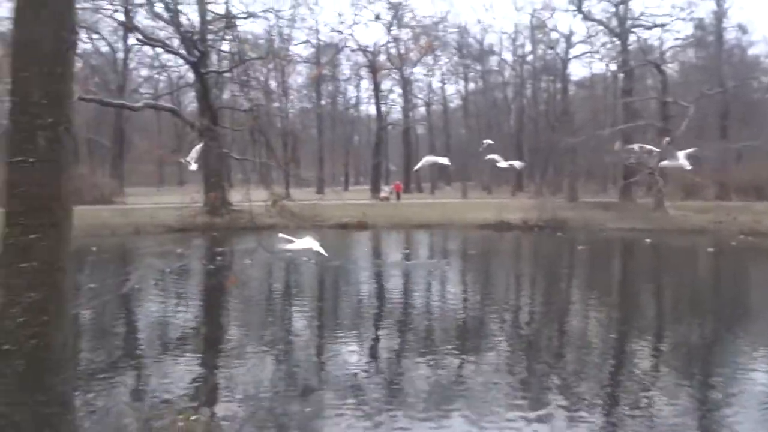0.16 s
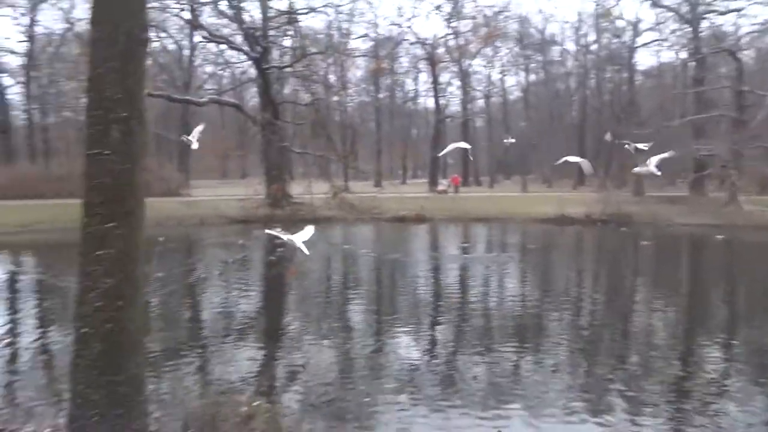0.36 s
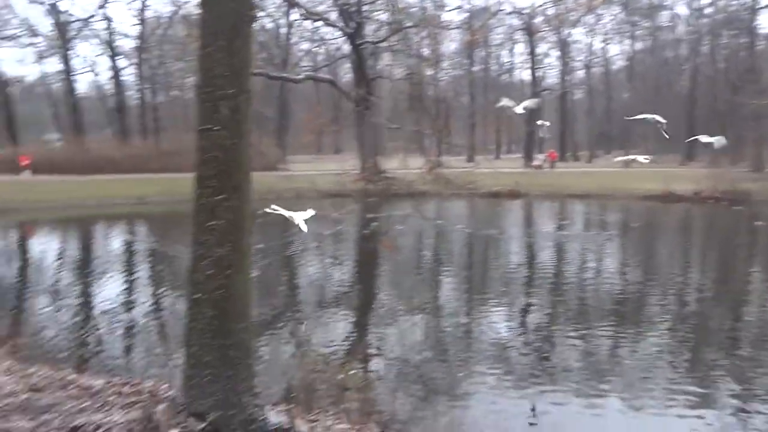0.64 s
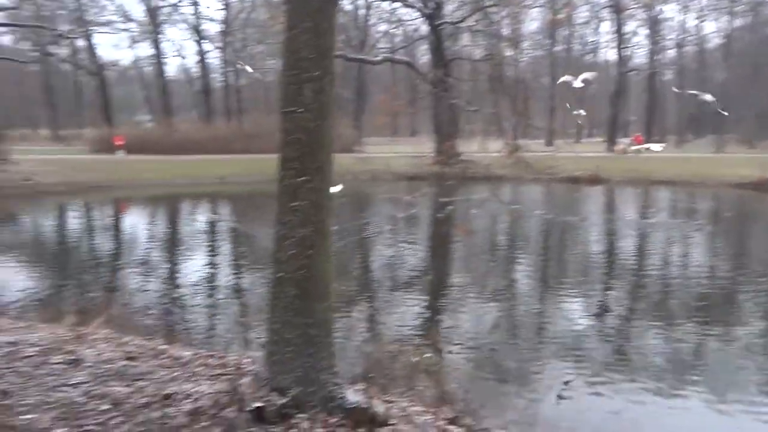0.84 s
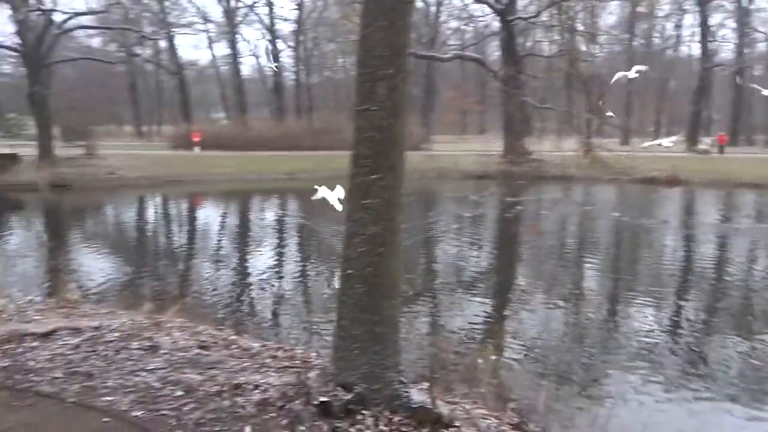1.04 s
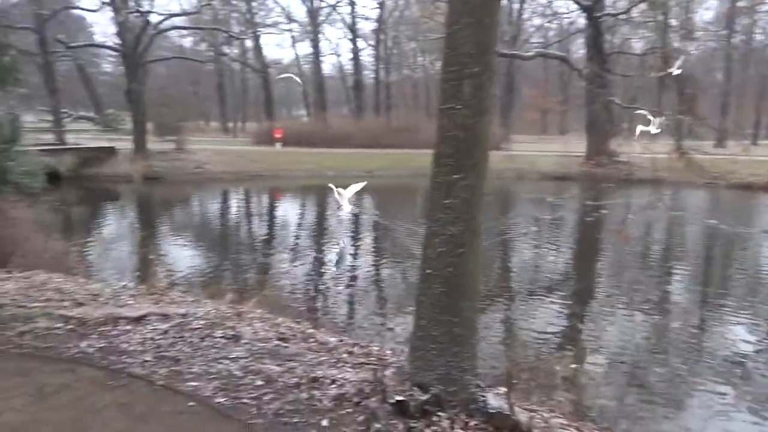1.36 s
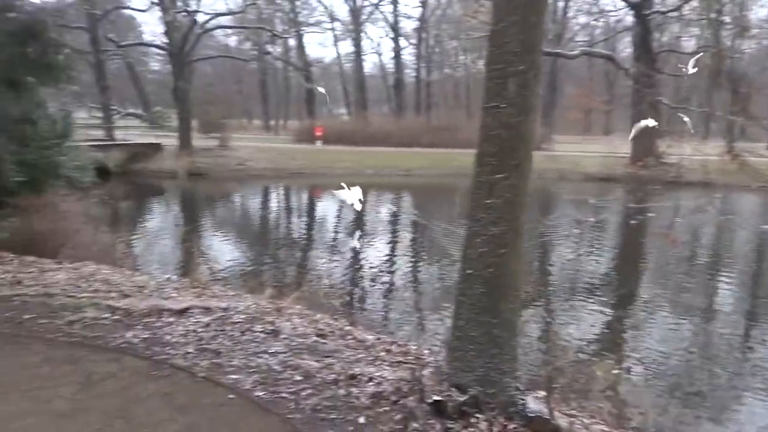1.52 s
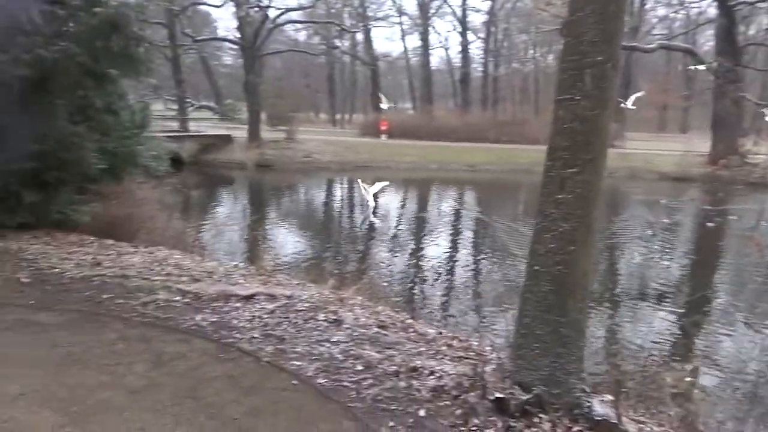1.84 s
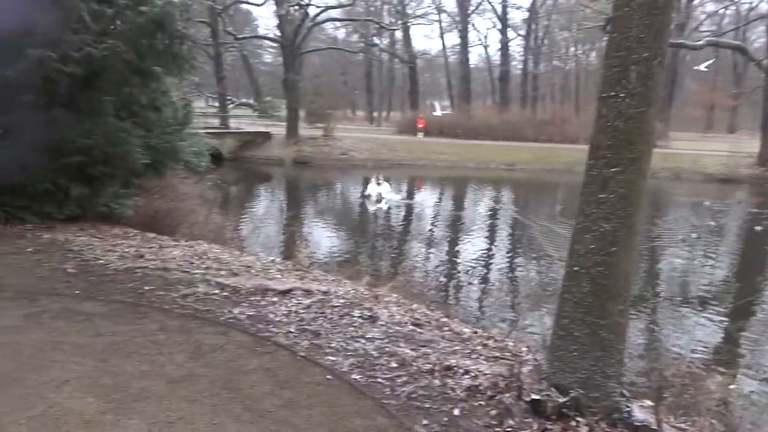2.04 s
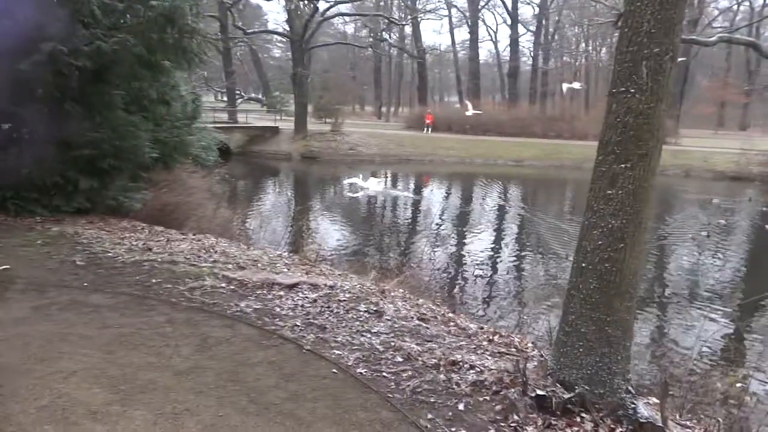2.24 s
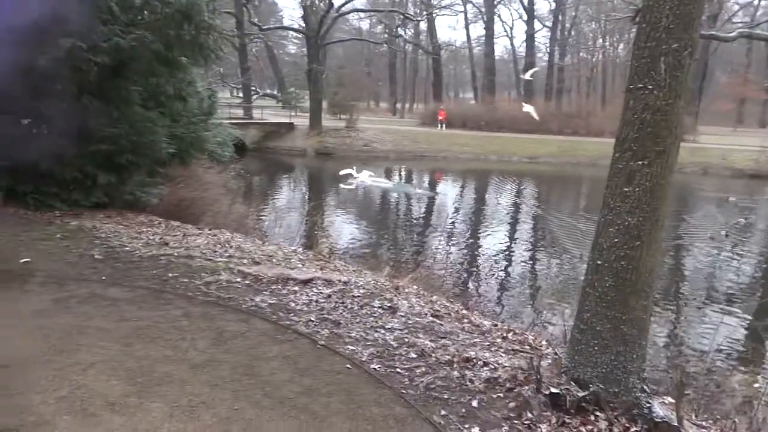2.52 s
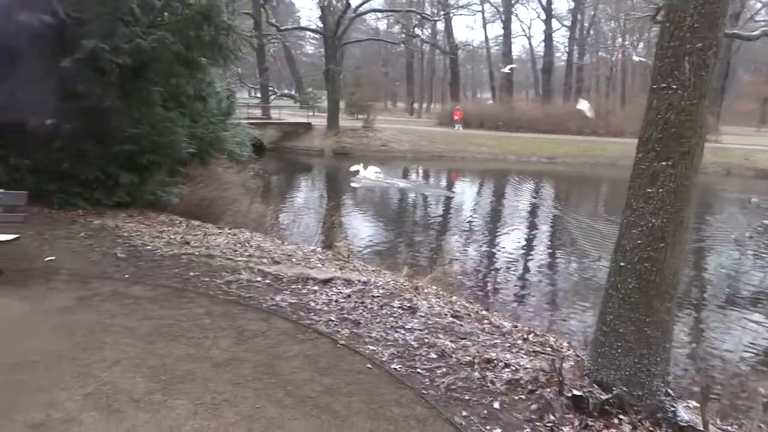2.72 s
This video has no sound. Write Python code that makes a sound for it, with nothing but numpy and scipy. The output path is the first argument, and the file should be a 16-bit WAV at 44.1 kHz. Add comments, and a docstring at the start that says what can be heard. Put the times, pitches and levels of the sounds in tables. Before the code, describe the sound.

A swan's wingbeats pulse about four times a second, each a short airy swish with a throaty hum, then feet slap water and spray hisses; rattling gulls call early and late, wind buffeting a handheld microphone outdoors.

```python
"""Wind turbulence, a filtered-noise town hum and traffic rumble last throughout, with tiny grip ticks.
Two gulls rattle at the start, their voices restarted by each pulse. A swan flies low over a park pond:
downstrokes swish as noise bursts and flight feathers hum as wavering tones. From 1.9 s feet and body
slap the water as noise bursts, and spray runs out as a noise of fine drops. Near the end a faint gull
and a near one call, and a hollow plop rings; trees and banks return scattered echoes of birds and water."""
import sys
import numpy as np
from scipy import signal
from scipy.fft import rfft, irfft
from scipy.io import wavfile
from scipy.ndimage import uniform_filter1d

SR = 44100
rng = np.random.default_rng(int(sys.argv[2]) if len(sys.argv) > 2 else 0)


def generate_wav(signal):
    """Clip the signal to [-1, 1] and save it as 16-bit WAV at the path in sys.argv[1]."""
    frames = np.transpose(np.atleast_2d(signal))
    scaled = np.clip(frames, -1, 1) * 32767
    pcm = np.round(scaled).astype(np.int16)
    wavfile.write(sys.argv[1], SR, pcm)


N = 127008


def undb(db):
    """Decibel definition: amplitude ratio from a level."""
    return 10 ** (np.asarray(db, float) / 20)


def level(x, db):
    """Root-mean-square normalisation: scale x to a level."""
    return x * undb(db) / np.sqrt(np.mean(x ** 2))


def noise():
    """White noise: equal power at every frequency."""
    return rng.standard_normal(N)


def curve(table, col=1):
    """Linear interpolation: a column of a table over time."""
    rows = np.array(table, float)
    return np.interp(np.arange(N) / SR, rows[:, 0], rows[:, col])


def colour(x, points_db):
    """Spectral shaping: apply gain points over log frequency, falling away outside them."""
    hz, db = np.array(points_db, float).T
    log_hz = np.log(np.arange(N // 2 + 1) * SR / N + 1)
    gain_db = np.interp(log_hz, np.log(hz), db)
    gain_db -= 18 * np.clip(np.log(hz[0]) - log_hz, 0, None)
    gain_db -= 18 * np.clip(log_hz - np.log(hz[-1]), 0, None)
    return irfft(rfft(x) * undb(gain_db), N)


def walk(rate):
    """Band-limited fluctuation: random levels held 1 / rate s and smoothed twice; spread near 1."""
    hold = int(SR / rate)
    steps = np.repeat(rng.standard_normal(N // hold + 1), hold)
    return 1.3 * uniform_filter1d(uniform_filter1d(steps, hold), hold)[:N]


def gate(start, length, edge, rise=None):
    """Squared-sine envelope: smooth rise and fall centred on the start and the end."""
    t = np.arange(N) / SR
    ramp = np.minimum((t - start) / (rise or edge), (start + length - t) / edge)
    return np.sin(np.pi / 2 * np.clip(ramp + .5, 0, 1)) ** 2


def decay(start, tau):
    """Exponential damping: an abrupt onset falling with time constant tau."""
    t = np.arange(N) / SR - start
    return (t >= 0) * np.exp(-np.abs(t) / tau)


def pan(x, db):
    """Interchannel level difference: left minus right equals db."""
    return x * undb(np.array([[db], [-db]]) / 2)


def wide(points_db, side_db):
    """Partial coherence: coloured noise with an unrelated, weaker side signal."""
    mid = level(colour(noise(), points_db), 0)
    side = level(colour(noise(), points_db), 0)
    return mid + colour(side, side_db) * np.array([[1], [-1]])


# Side share of wind and rumble: frequency [Hz], side_minus_mid [dB]
WIND_SIDE = [(25, -21), (60, -13.5), (150, -6.5), (400, -7)]
# Far traffic spectrum: frequency [Hz], relative density [dB per Hz]
RUMBLE_SPECTRUM = [(38, -14), (55, 0), (75, -2), (110, -14)]


def rumble():
    """Low-frequency propagation: far traffic arrives as steady noise below about 110 Hz."""
    return undb(-50) * wide(RUMBLE_SPECTRUM, WIND_SIDE)


# Town spectrum: frequency [Hz], relative density [dB per Hz]
TOWN_SPECTRUM = [(150, -27), (250, -7), (298, -14), (471, -6), (607, -6), (833, -6.5), (1090, -8),
                 (1140, -8), (1500, -12), (1870, -11), (2350, -17), (3050, -24.5), (4200, -31),
                 (6300, -34.5), (11000, -34), (14300, -69), (22000, -120)]
# Town side share: frequency [Hz], side_minus_mid [dB]
TOWN_SIDE = [(300, -16), (650, -21), (1500, -13.5), (4000, -4), (11000, -7.5)]
# Slow swell of the town: time_s [s], gain_db [dB]
TOWN_GAIN = [(0, 4), (.3, 1), (.7, 2.5), (1.1, -1), (1.4, -0.5), (1.9, 3.16), (2.4, -1.5), (2.88, 0.5)]
TOWN_DB = -41


def town():
    """Superposition of many far sources: a broad noise hum that swells slowly."""
    return wide(TOWN_SPECTRUM, TOWN_SIDE) * undb(TOWN_DB + curve(TOWN_GAIN) + 1.35 * walk(9))


# Wind gusts: time_s [s], level_db [dB]
GUSTS = [(0.0, -43), (0.04, -33), (0.22, -42.5), (0.35, -32.5), (0.41, -39.5), (0.55, -35.5), (0.58, -46),
         (0.68, -33.5), (0.69, -34), (0.95, -37), (0.97, -32.5), (1.34, -39.5), (1.37, -48), (1.48, -34.5),
         (1.49, -38.5), (1.8, -33), (1.93, -42), (1.97, -32), (2.07, -42), (2.45, -41), (2.49, -43.5),
         (2.88, -43.5)]
# Wind spectrum: frequency [Hz], relative density [dB per Hz]
WIND_SPECTRUM = [(15, -45), (25, -17), (50, 0.5), (92, 0), (141, -1), (221, -12.5), (303, -13),
                 (400, -23.5), (520, -36), (880, -120)]


def wind():
    """Turbulent pressure: low-frequency noise buffets the microphone with the gusts."""
    return wide(WIND_SPECTRUM, WIND_SIDE) * undb(curve(GUSTS) + 1.5 * walk(20))


# Grip ticks: start_s [s], level_db [dB], low_part_db [dB], decay_s [s]
GRIP_TICKS = [(.2573, -38, -10, 0.0016), (0.302, -41, -6, 0.0017), (0.5554, -43, -1.5, 0.0019),
              (.6165, -31, 0, 0.0038), (1.199, -30, -16, .0012), (1.2491, -39, -6, .001),
              (1.3648, -35.5, -9, 0.0012), (1.7025, -35, -8, .0012), (1.867, -41, -10, .0012),
              (2.049, -35, -8, .002), (2.154, -33, -8, 0.0022), (2.3411, -33, -8, .0012),
              (2.383, -36, -6, .0012)]


def ticks():
    """Impulsive contact: short damped noise with a bright and a duller part."""
    high = level(colour(noise(), [(5500, 0), (11000, 0)]), -6)
    low = level(colour(noise(), [(900, -5), (2500, 0), (4500, 0)]), -9)
    return sum(undb(db) * decay(start, tau) * (high + undb(low_db) * low)
               for start, db, low_db, tau in GRIP_TICKS)


PARK_T60_S, PARK_GAIN_DB, PARK_SIDE_DB = 0.45, -14.5, -10


def park(x):
    """Diffuse reverberation: trees and banks scatter echoes that decay exponentially."""
    t = np.arange(int(.6 * SR)) / SR
    tail = rng.standard_normal((2, len(t))) * 10 ** (-3 * t / PARK_T60_S) * np.clip(t / 0.019, 0, 1)
    # a one-pole low-pass dulls the echoes
    echoes = signal.lfilter([1], [1, -.6], tail) / np.sqrt(np.sum(tail ** 2))
    mid, side = signal.fftconvolve(x[None], echoes)[:, :N]
    return undb(PARK_GAIN_DB) * (mid + undb(PARK_SIDE_DB) * side * np.array([[1], [-1]]))


# Gull calls, four tables alike: time_s [s], pitch_hz [Hz], relative level_db [dB],
# rattle_rate [pulses per s], throat_ring_db [dB], brightness_db of the upper rings [dB]
FIRST_CALL = [(0, 775, -43, 70, -3, 5), (.025, 775, -38, 68, -9, 0), (.06, 768, -37.5, 68, -12, -1),
              (.095, 755, -40.5, 72, -12, 0), (.108, 743, -51, 65, -6, 8), (.17, 730, -57, 59, -4, 7)]
FAR_CALL = [(.24, 1000, -57, 92.1, 2, -8), (.3, 1010, -52, 95.4, 4, -3), (.34, 1000, -50, 98, 4, -4),
            (.37, 975, -46.5, 100.9, -2, -4), (.41, 985, -44.5, 102.5, 1, -4),
            (.45, 990, -50, 104.9, 3, -6), (.53, 980, -58, 105.2, 3, -1)]
FAINT_CALL = [(2.33, 790, -61, 75, -15, -3), (2.38, 780, -55, 75.3, -12, -3),
              (2.5, 765, -54, 75.4, -15, -1), (2.57, 750, -58, 75, -15, -3)]
NEAR_CALL = [(2.59, 900, -49, 84.34, -15, -8), (2.615, 950, -40.5, 84, -18, -10),
             (2.63, 985, -38, 83, -18, 0), (2.655, 1000, -40.5, 82, -10, 3.5),
             (2.675, 1000, -40, 80.9, 1.5, 3), (2.71, 985, -38, 80.8, 1, 2), (2.74, 980, -37.5, 79, -4, 0),
             (2.76, 990, -37.5, 79, -10, -1), (2.79, 995, -35.5, 79, -16, -2),
             (2.82, 960, -38.5, 77.7, -16, -5), (2.88, 945, -38, 75.3, -20, -6)]
# Voice of each gull: rings as (multiple of the pitch, relative level [dB]), left_minus_right [dB],
# hoarseness_db midway between the second and third ring [dB], its climb per ring [dB], pulse sharpness
GULL_VOICES = [([(1, -13.5), (2, 2), (3, -14), (4.1, -18), (4.7, -21), (7.2, -26), (8.5, -22), (9.4, -25),
               (11, -29)], -0.8, -7, 2.6, .7), ([(2, 2), (2.97, -1), (3.85, -9), (6.3, -20)],
               -.6, -7, 1.5, 2.4), ([(1, -2), (2, 6), (3, -14), (4, -22)], -1.8, -7, 1.4, .9), ([(.97, -8),
               (1.99, 3.5), (2.93, -10.5), (4.08, -17), (4.6, -20), (5.15, -9.5), (5.42, -16), (6.05, -16),
               (7.05, -22.5)], -4.5, -7.5, 1.1, 1.3)]
# Air noise in the voice: frequency [Hz], relative density [dB per Hz]
RASP_SPECTRUM = [(900, -1), (3000, 1), (6000, -9), (9000, -14.5)]
RATTLE_JITTER, RATTLE_FLOOR_DB, THROAT_LAG_TURNS = .012, -16.5, .25
HOARSE_RATE_HZ, THROAT_HZ, RASP_DB = 699.4, 2222, -6


def gull(call, rings, pan_db, hoarse_db, climb_db, sharpness):
    """Pulsed excitation: each pulse restarts voice and throat rings, blurred by noise."""
    rate = curve(call, 3) * (1 + RATTLE_JITTER * walk(60))
    turn = np.cumsum(rate) / SR  # pulses elapsed

    def pulses(lag):
        """Amplitude modulation: one swell per turn above a floor."""
        return undb(RATTLE_FLOOR_DB) + np.abs(np.sin(np.pi * (turn - lag))) ** sharpness

    since_pulse_s = ((turn - THROAT_LAG_TURNS) % 1) / rate
    throat = undb(curve(call, 4)) * np.sin(2 * np.pi * THROAT_HZ * since_pulse_s)
    throat = throat * (1 + 0.53 * walk(HOARSE_RATE_HZ))

    phase = 2 * np.pi * np.cumsum(curve(call) * (1 + 0.006 * walk(150))) / SR
    pulse_starts = np.diff(np.floor(turn), prepend=0) > 0
    phase = phase - np.maximum.accumulate(phase * pulse_starts)

    voice = level(colour(noise(), RASP_SPECTRUM), RASP_DB + hoarse_db + 3 * (2 - climb_db))
    bright = undb(curve(call, 5))
    for k, (multiple, db) in enumerate(rings):
        hoarse = undb(hoarse_db + climb_db * (k - 1.5))
        sine, cosine = np.sin(multiple * phase), np.cos(multiple * phase)
        blur = walk(HOARSE_RATE_HZ) * sine + walk(HOARSE_RATE_HZ) * cosine
        ring = (sine + hoarse * blur) / np.hypot(1, hoarse)
        voice = voice + undb(db) * (bright if multiple > 2.5 else 1) * ring

    start, end = call[0][0], call[-1][0]
    envelope = 2 * undb(curve(call, 2) + 1.2 * walk(80)) * gate(start, end - start + .02, 0.0085)
    return pan(envelope * (pulses(0) * voice + pulses(THROAT_LAG_TURNS) * throat), pan_db)


def gulls():
    """Superposition: four calls add, each with its own voice."""
    calls = [FIRST_CALL, FAR_CALL, FAINT_CALL, NEAR_CALL]
    return sum(gull(call, *voice) for call, voice in zip(calls, GULL_VOICES))


# Slaps on the water: start_s [s], relative level_db [dB], decay_s [s]
WATER_SLAPS = [(1.9203, -27, 0.006), (1.931, -27, 0.004), (2.226, -31, .004), (2.2313, -31, .018)]
# Slap spectrum: frequency [Hz], relative density [dB per Hz]
SLAP_SPECTRUM = [(500, -4), (2000, 6), (4500, -2), (8000, -1.5), (11000, -2.5)]
RING_HZ, RING_DB, RING_T60_S = 2000, -2, .03  # cavity ring, level relative to the first slap


def slaps():
    """Impact radiation: feet and body make noise bursts; the first opens a ringing cavity."""
    bursts = sum(undb(db) * decay(start, tau) for start, db, tau in WATER_SLAPS)
    bursts = bursts * level(colour(noise(), SLAP_SPECTRUM), -4)
    start, db, _ = WATER_SLAPS[0]
    ring = np.sin(2 * np.pi * RING_HZ * np.arange(N) / SR) * decay(start, RING_T60_S / np.log(1000))
    return bursts + undb(db + RING_DB) * ring


# Spray course: time_s [s], relative level_db [dB]
SPRAY_LEVEL = [(1.9, -43), (1.96, -50), (2.02, -48), (2.1, -51.5), (2.19, -54), (2.215, -53.5),
               (2.26, -45.5), (2.35, -49.5), (2.42, -51), (2.55, -49), (2.64, -46), (2.75, -50.5),
               (2.88, -53)]
# Spray spectrum: frequency [Hz], relative density [dB per Hz]
SPRAY_SPECTRUM = [(300, -19), (1000, 0.5), (2500, 1), (5000, -4.5), (11000, -8)]
DROPS_PER_S, DROP_SCATTER_DB = 2200, 2.5


def spray():
    """Poisson-like process: random drop impulses of scattered strength over fine noise."""
    hits = rng.random(N) < DROPS_PER_S / SR
    drops = hits * undb(DROP_SCATTER_DB * rng.exponential(size=N)) * noise()
    hiss = level(colour(level(drops, -6.5) + noise(), SPRAY_SPECTRUM), 2.7)
    envelope = undb(curve(SPRAY_LEVEL) + 1.8 * walk(30) + 1.7 * walk(120))
    return hiss * envelope * gate(SPRAY_LEVEL[0][0] + 0.027, 2, .02)


# Modes of the plop: frequency [Hz], relative level_db [dB], t60_s [s]
HOLLOW_MODES = [(264, 0, 0.043), (562, 0, 0.045)]
PLOP_S, PLOP_DB = 2.782, -28


def plop():
    """Modal resonance: a hollow plop is a sum of damped sines."""
    t = np.arange(N) / SR - PLOP_S
    modes = sum(undb(db) * np.sin(2 * np.pi * hz * t) * decay(PLOP_S, t60 / np.log(1000))
                for hz, db, t60 in HOLLOW_MODES)
    return undb(PLOP_DB) * modes


# Downstroke swishes: start_s [s], length_s [s], relative level_db [dB]
DOWNSTROKES = [(0.177, 0.033, -38.5), (.434, .021, -35.5), (0.663, 0.021, -38), (0.679, 0.027, -45.5),
               (0.935, .032, -45), (.972, .016, -45.5), (1.211, 0.04, -45), (1.27, .055, -48),
               (1.467, 0.11, -41.5), (1.718, 0.095, -42), (1.955, 0.064, -41.5)]
# Swish spectrum: frequency [Hz], relative density [dB per Hz]
SWISH_SPECTRUM = [(700, -18), (1500, 3), (2600, 4), (4000, -9.5), (7000, -16.5), (11000, -18.5)]
SWISH_TAIL_S, SWISH_TAIL_DB = 0.049, -8.5  # decay time constant, level relative to the stroke


def swishes():
    """Aerodynamic noise: each downstroke is a noise burst with a decaying tail."""
    envelope = 0
    for start, length, db in DOWNSTROKES:
        tail = undb(SWISH_TAIL_DB) * decay(start + length, SWISH_TAIL_S)
        envelope = envelope + undb(db) * (gate(start, length, 0.35 * length) + tail)
    return envelope * undb(2.3 * walk(300)) * level(colour(noise(), SWISH_SPECTRUM), 0)


# Feather hums: start_s [s], length_s [s], pitch_hz [Hz], end_pitch_hz [Hz], relative level_db [dB]
FEATHER_HUMS = [(0, 0.051, 702, 665, -40), (0.171, 0.057, 491, 495, -33), (0.182, 0.028, 861, 839, -31),
                (0.197, 0.034, 604, 587, -31.5), (0.238, .03, 603, 662, -34),
                (0.256, 0.031, 720, 716, -30.5), (0.429, 0.027, 622.7, 617, -32.5),
                (.43, 0.025, 759.5, 805, -29), (0.466, 0.062, 680, 797, -35), (0.661, 0.062, 660, 701, -33),
                (.74, .06, 700, 760, -42), (0.928, .03, 687, 655, -35), (.94, 0.028, 840, 819, -31.5),
                (.972, .018, 820, 800, -39), (1.0, .04, 690, 700, -41), (1.214, 0.034, 680, 680, -38),
                (1.55, .06, 420, 380, -42), (1.25, 0.075, 710, 745, -39.5),
                (1.466, 0.058, 860.5, 794, -37.5), (1.47, 0.051, 560, 681, -35),
                (1.531, 0.051, 770, 798, -33), (1.717, 0.09, 837.7, 806.5, -34),
                (1.738, 0.054, 699, 659, -37), (1.964, 0.041, 850, 851, -37.5),
                (2.158, 0.021, 620, 740, -39.5), (2.308, 0.018, 680, 680, -40)]
AIR_DB, AIR_RATE_HZ, FLUTTER_DB, PITCH_WOBBLE = -4, 330, 1.5, 0.018
THIRD_HARMONIC_DB, RISE_SHARE, FALL_SHARE = -14, .3, 0.47  # shares of the hum length


def feather_hums():
    """Aeroelastic flutter: feathers hum at a wavering pitch with narrow-band air noise round it."""
    out, t = 0, np.arange(N) / SR
    wobble, flutter = walk(90), undb(FLUTTER_DB * walk(110))
    air = level(walk(AIR_RATE_HZ), AIR_DB)
    other_air = np.roll(air, N // 2)
    for start, length, hz, end_hz, db in FEATHER_HUMS:
        pitch = np.interp(t, [start, start + length], [hz, end_hz]) * (1 + PITCH_WOBBLE * wobble)
        phase = 2 * np.pi * np.cumsum(pitch) / SR
        tone = flutter * (np.sin(phase) + undb(THIRD_HARMONIC_DB) * np.sin(3 * phase))
        breath = air * np.cos(phase) + other_air * np.sin(phase)
        envelope = gate(start, length, FALL_SHARE * length, RISE_SHARE * length)
        out = out + undb(db) * envelope * (tone + breath)
    return out


def scene():
    """Linear superposition: near sources and their echoes add to the background."""
    wings = pan(feather_hums() + swishes(), -0.44)
    water = pan(slaps() + spray() + plop(), -0.81)
    near = wings + water + gulls()
    background = rumble() + town() + wind() + pan(ticks(), -.3)
    return near + park(near.mean(0)) + background


def record(dry):
    """Band limitation: a steep elliptic low-pass at 11120 Hz stands for the hand-held camera."""
    return signal.sosfilt(signal.ellip(10, .3, 60, 11120, fs=SR, output="sos"), dry)


dry = scene()
out = record(dry)
generate_wav(out)
```